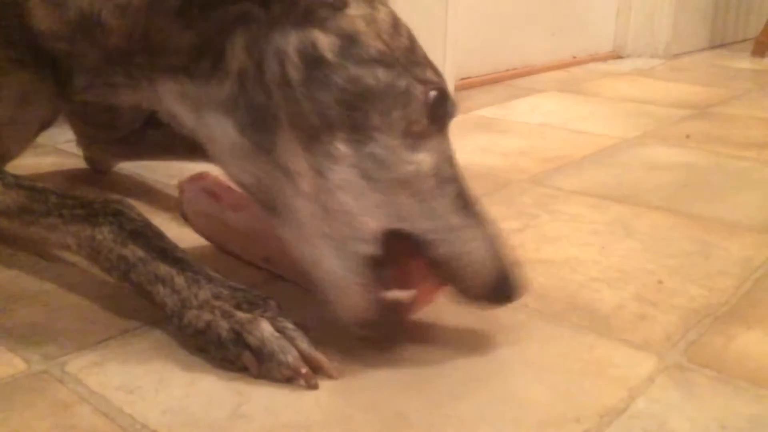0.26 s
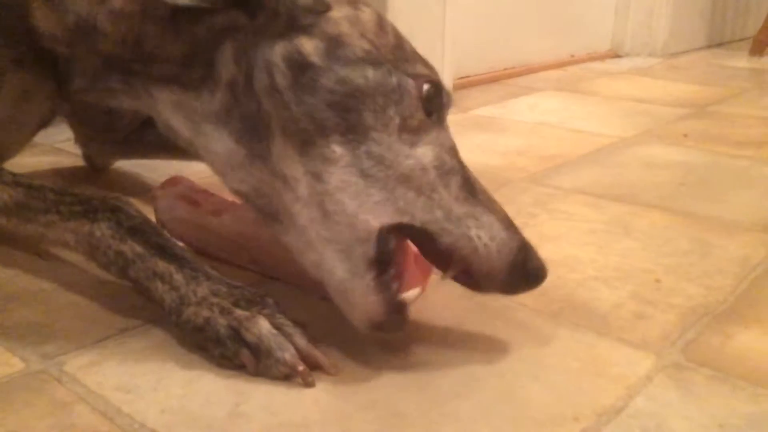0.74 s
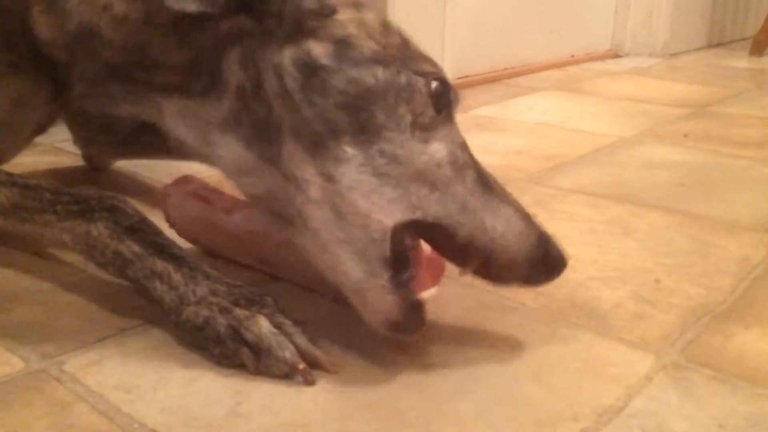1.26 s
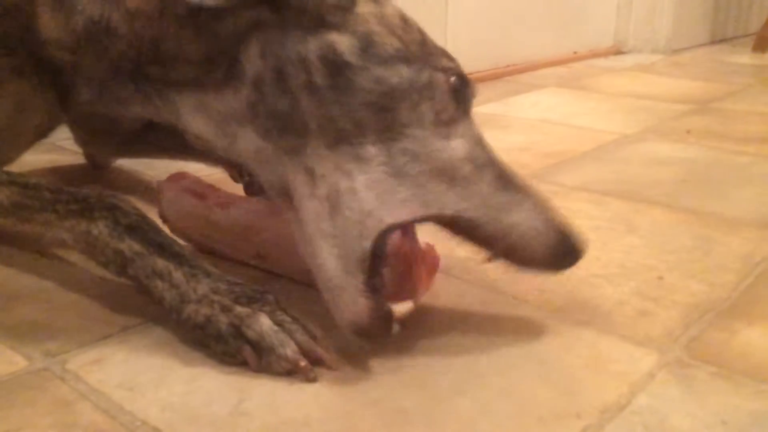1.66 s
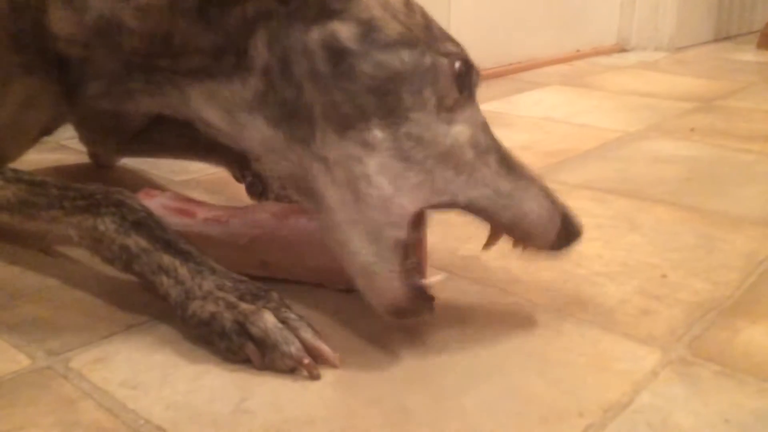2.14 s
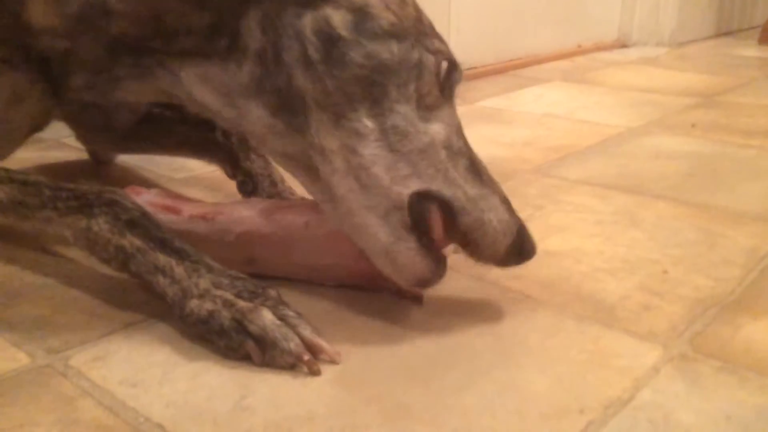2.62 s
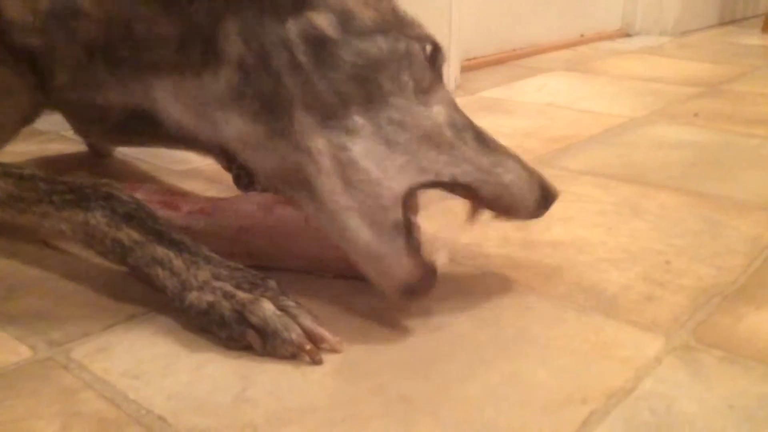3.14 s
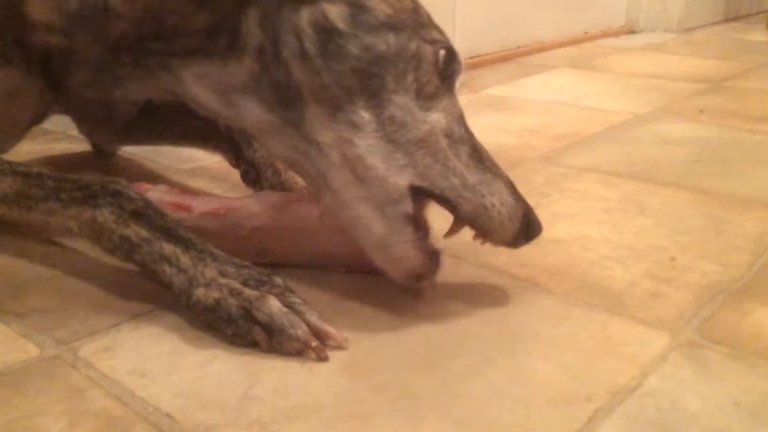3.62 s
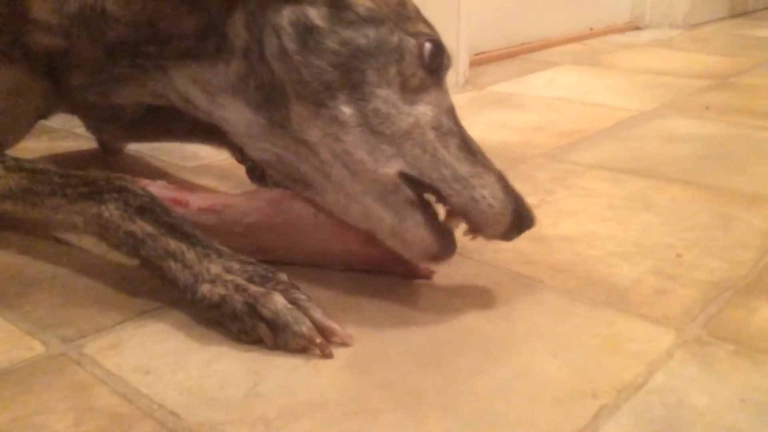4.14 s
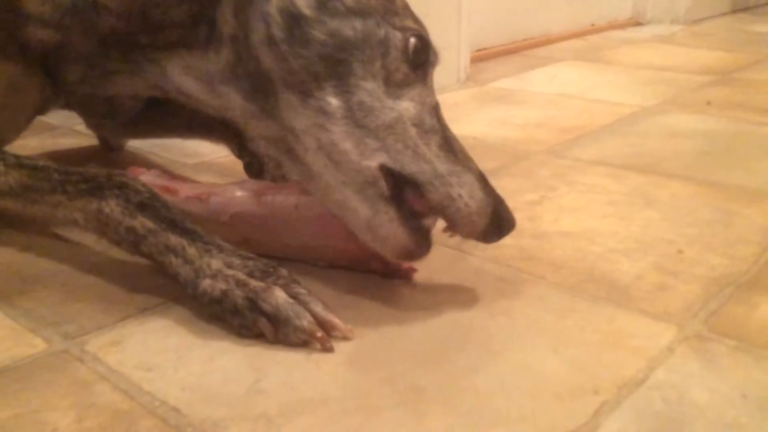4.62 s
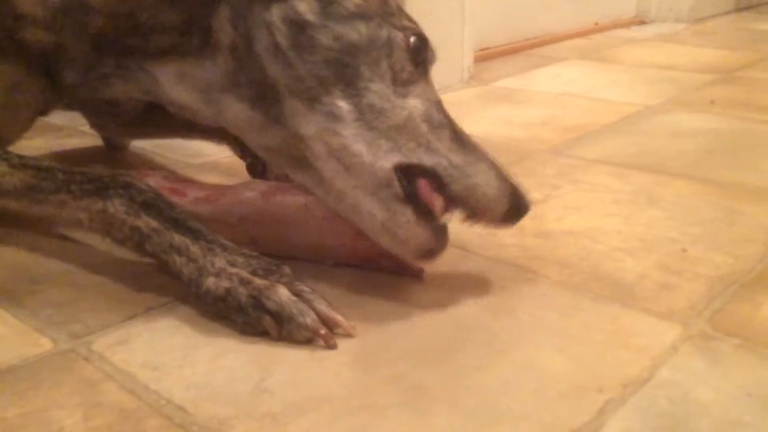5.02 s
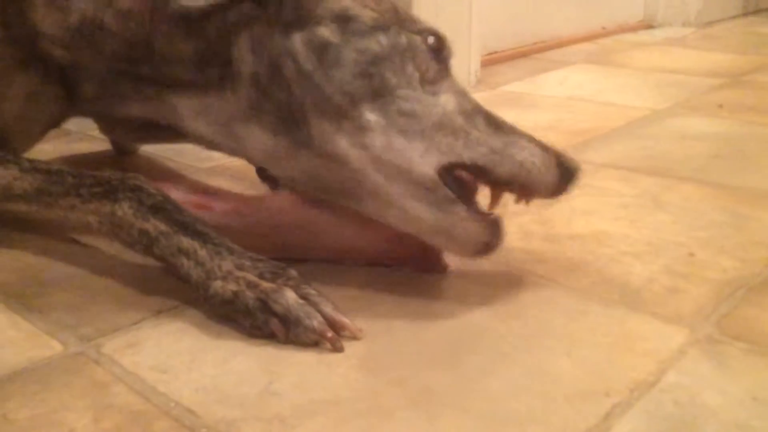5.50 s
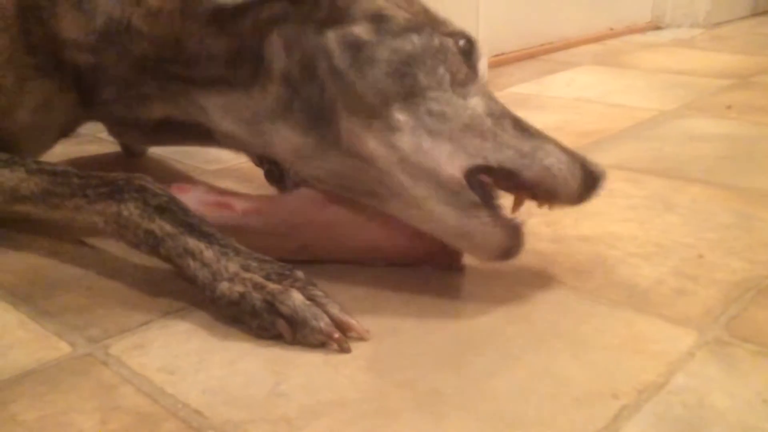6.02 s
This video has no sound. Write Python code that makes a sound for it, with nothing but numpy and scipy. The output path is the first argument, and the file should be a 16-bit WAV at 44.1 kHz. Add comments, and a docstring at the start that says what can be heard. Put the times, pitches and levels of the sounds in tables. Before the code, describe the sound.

Close by, teeth rasp and slip on a heavy raw bone, knocking and cracking it early, then fading to light clicks and skids.

```python
"""A light knock and a rasp of teeth on bone: a dog gnaws a big raw bone on kitchen tiles, close by.
Knocks are damped modes of bone and tooth with a burst of fractures; two cracks add shaft modes.
Scrapes are stick-slip grains under jaw pressure; clicks, smacks, bumps and spit are short bursts.
A faint tongue rub and hush lie beneath; decaying random echoes make the bare kitchen ring."""
import sys
import numpy as np
from scipy import signal
from scipy.fft import rfft, irfft
from scipy.io import wavfile

SR = 44100
rng = np.random.default_rng(int(sys.argv[2]) if len(sys.argv) > 2 else 0)


def transcribe(signal):
    """Save signal, clipped to [-1, 1], as a 16-bit WAV file at the path in sys.argv[1]."""
    frames = np.atleast_2d(signal).T
    limited = np.clip(frames, -1, 1)
    pcm = np.round(limited * 32767).astype(np.int16)
    wavfile.write(sys.argv[1], SR, pcm)


N = 276066
HIT = 4096  # samples in one blow


def undb(db):
    """Decibels to amplitude gain."""
    return 10 ** (np.asarray(db) / 20)


def blow(x):
    """Scale a blow so that its energy equals 5 ms at unit level."""
    return x * np.sqrt(SR / 200 / np.sum(x ** 2))


def add(track, start_s, x):
    """Mix x into the track from start_s."""
    i = int(np.clip(start_s * SR, 0, N - 1))
    track[i:i + len(x)] += x[:N - i]


def highpass(x, order, cutoff_hz):
    """Butterworth high-pass."""
    return signal.sosfilt(signal.butter(order, cutoff_hz, "high", fs=SR, output="sos"), x)


def along(points, hz):
    """Read (Hz, value) points on a log-frequency axis."""
    point_hz, value = np.transpose(points)
    return np.interp(np.log(hz + 1), np.log(point_hz), value)


def colour(x, points, tilt_db=0):
    """Minimum-phase filter of unit energy with the given spectrum, tilted per octave about 2 kHz."""
    hz = np.fft.rfftfreq(HIT, 1 / SR)
    octaves = np.log2(np.maximum(hz, 300) / 2000)
    gain = undb(along(points, hz) + tilt_db * octaves)
    cepstrum = irfft(np.log(gain))
    # fold the cepstrum forward in time: the response becomes causal
    cepstrum[1:HIT // 2] *= 2
    cepstrum[HIT // 2:] = 0
    response = irfft(np.exp(rfft(cepstrum)))
    return signal.fftconvolve(x, response / np.linalg.norm(response))[:len(x)]


def ring(modes, scatter=0.0137):
    """Damped sine modes of alternating sign, each randomly detuned by a share of its pitch."""
    t = np.arange(HIT) / SR
    out = np.zeros(HIT)
    for k, (hz, t60_s, level_db) in enumerate(modes):
        detuned_hz = hz * (1 + scatter * rng.standard_normal())
        out += (-1) ** k * undb(level_db - 60 * t / t60_s) * np.sin(2 * np.pi * detuned_hz * t)
    return out


def grit(count, per_s, spread_db):
    """Tiny fractures at random moments and of unequal size; unit power."""
    excess = np.minimum(rng.exponential(size=count), 3)
    sizes = undb(spread_db * excess) * rng.choice([-1, 1], count)
    x = sizes * (rng.random(count) < per_s / SR)
    return x / (x.std() + 1e-9)


def wander(n, points_per_s):
    """Straight lines between normal random values, clipped at 2, points_per_s of them a second."""
    values = rng.standard_normal(1024).clip(-2, 2)
    return np.interp(np.arange(n) / SR * points_per_s, np.arange(1024), values)


# splinter spectrum: freq_hz, density_db (per Hz)
SPLINTER_COLOUR = [(80, -82.5), (300, -4.5), (1200, 10), (2300, 2.5), (3300, 4.5), (4300, -2.5),
                   (5300, -3.5), (6500, -12.5), (7800, -10), (11000, -14.5), (15500, -28.5)]


def snap(fall_s, tilt_db):
    """A burst of fractures that dies within milliseconds."""
    decay = np.exp(-np.arange(HIT) / SR / fall_s)
    return blow(colour(grit(HIT, per_s=13000, spread_db=20.5) * decay, SPLINTER_COLOUR, tilt_db))


# teeth slip off, the bone knocks; the grip sets its pitch:
# start_s, thud_db, contact_cutoff_hz, tooth_db, body_pitch_hz
BITES = [(0.0768, -44.5, 900, -41, 510), (0.3443, -46, 1100, -39, 606), (0.883, -26, 990, -37, 519),
         (1.111, -46, 1160, -53, 550), (1.4907, -22.5, 1110, -32.5, 579), (1.81, -35, 1200, -42.5, 582),
         (1.9003, -31.5, 790, -35.5, 495), (2.048, -27, 860, -38.5, 504), (2.324, -35, 740, -44, 417),
         (2.5379, -24, 720, -24.5, 487), (2.836, -45.5, 600, -70, 524), (2.93, -48.5, 597, -68, 504),
         (3.149, -45.5, 720, -54, 484), (3.255, -28, 1060, -41.5, 503), (3.29, -37, 603, -47.5, 490),
         (4.005, -56, 820, -66, 530), (4.683, -49, 580, -48.5, 505), (4.797, -45, 647, -51, 510),
         (5.1519, -43, 520, -63.5, 490), (5.527, -37, 510, -47.5, 480), (5.558, -39.5, 526, -53, 456),
         (6.052, -31, 598, -41, 520), (6.085, -36, 595, -48, 468), (6.093, -40.5, 564, -47.5, 450)]
# the bone cracks: start_s, splinter_db, tooth_db, shaft_db, splinter_fall_s
CRACKS = [(2.0483, -32, -36, -56, 0.0011), (2.557, -20.5, -23, -22, 0.0066)]
# modes of the meaty bone on the tiles, at body pitch BONE_HZ: freq_hz, t60_s, level_db
BONE_MODES = [(226, 0.017, -11.5), (395, 0.0089, -1), (554, 0.0088, 1), (726, 0.009, -8),
              (888, 0.012, -9.5), (1070, 0.013, -8), (1360, 0.0037, -11)]
BONE_HZ = 520.7
# modes of a tooth on the hard shaft: freq_hz, t60_s, level_db
TOOTH_MODES = [(1397, 0.022, 9.5), (1562, 0.047, 6.5), (1883, 0.027, 5), (2360, 0.02, -5),
               (2840, 0.053, -11.5), (3244, 0.023, -10.5), (4130, 0.034, -6)]
# modes of the hard shaft as it splits: freq_hz, t60_s, level_db
SHAFT_MODES = [(3130, 0.043, -6), (3540, 0.014, 2), (4380, 0.048, -5.5), (6160, 0.01, -5),
               (6580, 0.02, -5.5)]
SPLINTER_RE_TOOTH_DB, SPLINTER_FALL_S = -3.5, 0.0083  # ordinary bite
BITE_TILT_DB_PER_OCT, CRACK_TILT_DB_PER_OCT = 5.5, 3.34
HARD_TILT_DB, FORCE_TILT_DB = 3, 0.18  # added tilt: per octave of contact cut-off, per dB of thud


def bone_thud(contact_cutoff_hz, body_pitch_hz):
    """Bone modes scaled to the body pitch, duller where meat cushions the contact."""
    modes = [(hz * body_pitch_hz / BONE_HZ, t60_s, db) for hz, t60_s, db in BONE_MODES]
    cushion = signal.butter(4, contact_cutoff_hz, fs=SR, output="sos")
    thud = signal.sosfilt(cushion, ring(modes, scatter=0.033))
    return blow(highpass(thud, 2, 140))  # a small body radiates little bass


def bites():
    """Each blow thuds the bone, rings a tooth and splinters the surface; cracks ring the shaft."""
    thuds, teeth, splinters, spray = np.zeros((4, N))
    contacts = []
    for start_s, splinter_db, tooth_db, shaft_db, fall_s in CRACKS:
        add(splinters, start_s, undb(shaft_db) * blow(ring(SHAFT_MODES, scatter=0.0062)))
        contacts.append((start_s, tooth_db, splinter_db, CRACK_TILT_DB_PER_OCT, fall_s))
    for start_s, thud_db, cutoff_hz, tooth_db, body_pitch_hz in BITES:
        add(thuds, start_s - .0006, undb(thud_db) * bone_thud(cutoff_hz, body_pitch_hz))
        # hard, strong blows splinter more brightly than padded, weak ones
        hardness_db = HARD_TILT_DB * np.log2(cutoff_hz / 850)
        force_db = FORCE_TILT_DB * (thud_db + 20.0)
        tilt_db = BITE_TILT_DB_PER_OCT + hardness_db + force_db
        contacts.append((start_s, tooth_db, tooth_db + SPLINTER_RE_TOOTH_DB, tilt_db, SPLINTER_FALL_S))
    for start_s, tooth_db, splinter_db, tilt_db, fall_s in contacts:
        add(teeth, start_s, undb(tooth_db) * blow(ring(TOOTH_MODES, scatter=0.028)))
        add(splinters, start_s, undb(splinter_db) * snap(fall_s, tilt_db))
        # summed over all directions, the splinters reach the walls with a smooth spectrum
        smooth = colour(signal.unit_impulse(HIT), SPLINTER_COLOUR, tilt_db - .3)
        add(spray, start_s, undb(splinter_db) * blow(smooth))
    return thuds, teeth, splinters, spray


def swell(rise_s, fall_s):
    """Pressure that builds for twice rise_s, peaks and lets go."""
    t = np.arange(-2 * rise_s, 5 * fall_s, 1 / SR)
    return np.where(t < 0, np.exp(-(t / rise_s) ** 2), np.exp(-np.abs(t) / fall_s))


# rasp spectrum: freq_hz, density_db (per Hz)
GRIND_COLOUR = [(60, -12), (200, 7.5), (330, 2.5), (530, 9.5), (800, -1.5), (1150, -2.5), (1650, 0),
                (2300, -5.5), (3500, -8), (5500, -18), (10500, -23), (15500, -35)]
CATCHES_PER_S, CATCH_DETUNING, CATCH_SPREAD_DB = 460, 0.089, 12.5
CATCH_CYCLES = 34  # cycles per t60, so high catches are shortest


def scrape(pressure, tilt_db):
    """Stick-slip grains that follow the jaw pressure; single catches ring a tooth."""
    n = len(pressure)
    # ridges of the bone pass under the tooth, so the grip stutters
    grip = pressure * undb(5.1 * wander(n, 130.6))
    rasp = colour(grip * grit(n, per_s=2200, spread_db=4.0), GRIND_COLOUR, tilt_db)
    # every catch grips the tooth at another spot and rings one mode at a new pitch
    catches = np.zeros(n + HIT)
    for when, which, size in rng.random((int(CATCHES_PER_S * n / SR) + 1, 3)):
        i = int(when * n)
        hz, _, mode_db = TOOTH_MODES[int(which * len(TOOTH_MODES))]
        tone = ring([(hz, CATCH_CYCLES / hz, mode_db * 1.2)], CATCH_DETUNING)
        catches[i:i + HIT] += grip[i] * undb(CATCH_SPREAD_DB * size) * tone
    stroke = blow(rasp) + undb(-2.5 - tilt_db) * blow(catches[:n])
    return stroke * np.linalg.norm(pressure) / np.linalg.norm(stroke)


# the jaw bears down and the teeth grind: start_s, length_s (before release), level_db, tilt_db_per_oct
GRINDS = [(0.113, 0.029, -46, 2), (0.201, 0.089, -52.5, 1), (0.677, 0.064, -54.5, 3),
          (0.747, 0.035, -48, -3), (0.828, 0.15, -57.5, -1), (1.132, 0.11, -49, -2),
          (1.269, 0.027, -42, 2.24), (1.326, 0.16, -53, -1.5), (2.371, 0.22, -58, -1),
          (2.822, 0.24, -55.5, -1.5), (3.269, 0.2, -59.5, 4.5), (4.731, 0.3, -69.5, -0.5),
          (5.528, 0.15, -65.5, 3.5), (6.188, 0.027, -58, -1)]
# a tooth skids quickly over the bone: peak_s, length_s (rise + fall constants), level_db, tilt_db_per_oct
SKIDS = [(0.348, 0.012, -40, 1), (1.9, 0.018, -32.5, 0.5), (2.047, 0.0091, -29.5, 3.5),
         (3.506, 0.03, -52.5, 3), (4.231, 0.018, -45, 2.5), (4.299, .02, -57, 3), (4.57, 0.017, -49, 3),
         (4.92, .023, -43, 3), (5.275, 0.0081, -47, 4.5), (5.757, 0.014, -41.5, 1.5),
         (5.779, 0.023, -40.5, 2.5)]
GRIND_ATTACK_S, GRIND_RELEASE_S = 0.014, .04
SKID_RISE_SHARE = 0.61  # of length_s
CRUMBLE_START_S, CRUMBLE_FALL_S, CRUMBLE_DB = 2.557, 0.085, -40


def scrapes():
    """Held grinds, quick skids, and the crumbling that follows the second crack."""
    out = np.zeros(N)
    for start_s, length_s, level_db, tilt_db in GRINDS:
        t = np.arange(0, length_s + 5 * GRIND_RELEASE_S, 1 / SR)
        release = np.exp(-np.maximum(t - length_s, 0) / GRIND_RELEASE_S)
        pressure = np.minimum(t / GRIND_ATTACK_S, 1) * release
        add(out, start_s, undb(level_db) * scrape(pressure, tilt_db))
    for peak_s, length_s, level_db, tilt_db in SKIDS:
        rise_s = length_s * SKID_RISE_SHARE
        pressure = swell(rise_s, length_s - rise_s)
        add(out, peak_s - 2 * rise_s, undb(level_db) * scrape(pressure, tilt_db))
    crumble = scrape(swell(0.0014, CRUMBLE_FALL_S), tilt_db=2.5)
    add(out, CRUMBLE_START_S, undb(CRUMBLE_DB) * crumble)
    return out


# teeth tap the bone or each other: start_s, level_db, pitch_hz
CLICKS = [(0.278, -64, 1400), (0.356, -52, 2300), (0.484, -50, 3960), (0.495, -58, 2680),
          (.67, -49.5, 1500), (0.763, -53, 1570), (0.794, -50, 1390), (0.864, -50, 1300), (1.19, -49, 1450),
          (2.483, -54, 1330), (2.797, -53, 4023), (2.933, -53, 1740), (3.124, -68, 3650),
          (3.631, -62.5, 4140), (3.7867, -64.5, 1434), (3.934, -62, 1790), (4.023, -53, 2830),
          (4.032, -52.5, 2150), (4.1144, -55.5, 2660), (4.148, -58, 1550), (4.428, -58, 1500),
          (4.434, -64, 3200), (4.4437, -50, 2620), (4.46, -59, 3100), (4.621, -48.5, 1760),
          (4.646, -54, 1630), (4.688, -73, 1530), (4.731, -59, 3080), (4.792, -51, 1460),
          (5.106, -52, 1800), (5.35, -54, 1800), (5.44, -60, 1440), (5.4514, -42, 1510), (5.659, -66, 1590),
          (5.926, -57, 3440), (5.938, -50.5, 3430), (5.961, -39.5, 2140), (6.0614, -48.5, 4480),
          (6.166, -57.5, 3650), (6.226, -65, 3960), (6.252, -43.5, 3600)]
# resonance of the mouth gap: ratio (multiple of the tap's pitch), level_db
MOUTH_GAP = [(.2, -31), (.6, -4), (1, 4), (1.4, -4), (2.4, -3.5), (4, -20), (8, -18)]
SKITTER_LENGTH_S, SKITTER_RE_RING_DB = 0.0048, -4.5


def clicks():
    """A light touch rings the tooth modes near its pitch and skitters for a few milliseconds."""
    out, t = np.zeros(N), np.arange(HIT) / SR
    for start_s, level_db, pitch_hz in CLICKS:
        modes = []
        for hz, t60_s, mode_db in TOOTH_MODES:
            octaves_off = abs(np.log2(hz / pitch_hz))
            modes.append((hz, t60_s * 1.6, mode_db * 0.3 - 15 * octaves_off))
        tick = highpass(ring(modes, scatter=0.036), 2, 1100)
        contact = grit(HIT, per_s=8300, spread_db=7.5) * np.exp(-(t / SKITTER_LENGTH_S) ** 2)
        # the gap of the mouth adds one broad resonance
        gap = [(ratio * pitch_hz, gap_db) for ratio, gap_db in MOUTH_GAP]
        skitter = blow(colour(contact, gap))
        add(out, start_s, undb(level_db) * (blow(tick) + undb(SKITTER_RE_RING_DB) * skitter))
    return out


# wet lips and tongue: start_s, level_db
SMACKS = [(0.63, -56), (1.9018, -42), (0.798, -51), (1.055, -53.5), (1.604, -55.5), (1.726, -53),
          (1.8576, -48.5), (2.309, -75), (2.443, -58), (3.0587, -55.5), (3.314, -51), (3.562, -60.5),
          (3.154, -59), (3.645, -61), (4.648, -61), (4.841, -61)]
SMACK_TILT_DB_PER_OCT = 7


def smacks():
    """Wet lips and tongue only snap: a bright fracture burst without a ring."""
    out = np.zeros(N)
    for start_s, level_db in SMACKS:
        add(out, start_s, undb(level_db) * snap(0.005, SMACK_TILT_DB_PER_OCT))
    return out


# dull bumps of the jaw and the padded end of the bone:
# start_s, level_db, ref_pitch_hz (glides from 1.22 times this towards 0.42)
BUMPS = [(0.673, -44, 200), (2.558, -32.5, 272), (3.15, -38, 194), (3.157, -32.5, 130)]


def bumps():
    """Soft low blows of a few cycles that sink in pitch as the flesh gives way."""
    out, t = np.zeros(N), np.arange(HIT) / SR
    for start_s, level_db, ref_pitch_hz in BUMPS:
        pitch_hz = ref_pitch_hz * (0.42 + 0.8 * np.exp(-t / 0.018))
        phase = 2 * np.pi * np.cumsum(pitch_hz) / SR
        body = np.exp(-t / 0.012) * np.sin(phase)
        overtone = 0.4 * np.exp(-t / 0.0078) * np.sin(2.13 * phase)
        add(out, start_s, undb(level_db) * blow(body + overtone))
    return out


def saliva(count=260):
    """Tiny films of spit pop on meat and lips, each at its own pitch, louder near each scrape."""
    out = np.zeros(N)
    starts_s, lengths_s, stroke_db = np.transpose([row[:3] for row in GRINDS + SKIDS])
    for when, pitch, size in rng.random((count, 3)):
        start_s, hz = when * N / SR, 1300 * 2 ** (2.0 * pitch)
        away_s = np.abs(start_s - np.clip(start_s, starts_s, starts_s + lengths_s))
        work_db = np.max(np.minimum(stroke_db - 8.5, -48) - 400 * away_s).clip(-64)
        level_db = work_db - 13 + 16.3 * size ** 2 - 8 * pitch
        pop = ring([(hz, .004, 0), (hz * 1.2, .003, -3)])
        add(out, start_s, undb(level_db) * blow(pop))
    return out


# rub spectrum: freq_hz, density_db (per Hz)
TONGUE_COLOUR = [(100, -15), (450, -2), (900, -7.5), (1600, -5), (3400, -7.5), (6500, -12.5),
                 (15500, -18.5)]
# rub level: time_s, level_db
TONGUE_LEVEL = [(0, -69.5), (.3, -68), (3.4, -61.5), (3.75, -77), (4.101, -67.5), (4.5, -68), (6.2, -62.5)]
TONGUE_MOVES_PER_S, TONGUE_SWING_DB = 14, 3


def tongue():
    """Tongue and lips rub faintly on the meat: fine grit whose level comes and goes."""
    swing = undb(TONGUE_SWING_DB * wander(N, TONGUE_MOVES_PER_S))
    rub = grit(N, per_s=2500, spread_db=3.0) * swing
    level_db = np.interp(np.arange(N) / SR, *np.transpose(TONGUE_LEVEL))
    return undb(level_db) * colour(rub / rub.std(), TONGUE_COLOUR)


# reverberation time: freq_hz, t60_s
KITCHEN_T60 = [(100, 0.51), (300, 0.18), (570, 0.56), (900, 0.68), (1840, 0.5), (4850, 0.55), (12800, 0.34)]
REFLECTION_GAP_S, REFLECTION_RISE_S = 0.003, 0.01  # the walls answer late and build up


def kitchen(x):
    """Hard tiles and cupboards: strong early reflections thicken into a diffuse tail."""
    t = np.arange(SR) / SR
    density = np.clip(0.23 + (t / .02) ** 2, 0, 1)
    echoes = rng.choice([-1, 1], SR) * (rng.random(SR) < density) / np.sqrt(density)
    onset = np.clip((t - REFLECTION_GAP_S) / REFLECTION_RISE_S, 0, 1)
    echoes *= onset * (1 + 0.8 * np.exp(-t / 0.034))
    # each frequency band decays at its own rate
    hz, _, frames = signal.stft(echoes, SR, nperseg=256)
    age_s = np.linspace(0, 1, frames.shape[1])
    decay_db = -60 * age_s / along(KITCHEN_T60, hz)[:, None]
    tail = signal.istft(frames * undb(decay_db), SR)[1]
    return signal.fftconvolve(x, tail / np.linalg.norm(tail))[:N]


# background spectrum: freq_hz, density_db (per Hz)
HUSH_COLOUR = [(15, -48), (25, 4), (86, -0.5), (193, 1), (260, -9), (421, -3.5), (741, -11.5),
               (1800, -14.5), (3170, -23), (7300, -30.5), (10100, -22), (15500, -36.5)]
HUSH_DB = -67.5


def hush():
    """Faint steady background: coloured Gaussian noise."""
    return undb(HUSH_DB) * colour(rng.standard_normal(N), HUSH_COLOUR)


MOUTH_ROOM_DB = -11.5


def scene():
    """Knocks spread through the floor into the room; sounds of the mouth stay closer."""
    thuds, teeth, splinters, spray = bites()
    grinding = scrapes()
    mouth = clicks() + smacks() + saliva() + tongue()
    low = bumps()
    room = kitchen(undb(-1.0) * thuds + undb(-4.0) * teeth + undb(-3.0) * spray + undb(-14) * low)
    room += kitchen(undb(MOUTH_ROOM_DB) * mouth + undb(-4.0) * grinding)
    return (thuds + teeth + splinters + mouth + grinding + low + room + hush())[None]


TOP_HZ = 15600


def record(dry):
    """The microphone loses the deep bass and the very top."""
    dry = highpass(dry, 2, 60)
    return signal.sosfilt(signal.ellip(10, .2, 80, TOP_HZ, fs=SR, output="sos"), dry)


dry = scene()
out = record(dry)
transcribe(out)
```